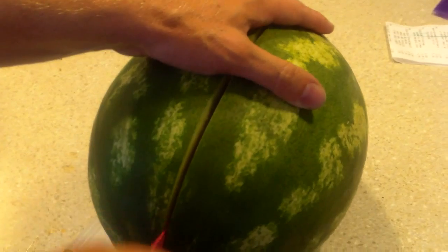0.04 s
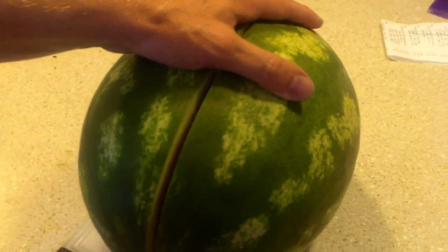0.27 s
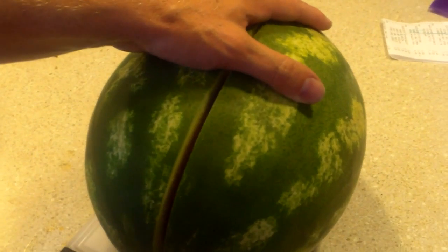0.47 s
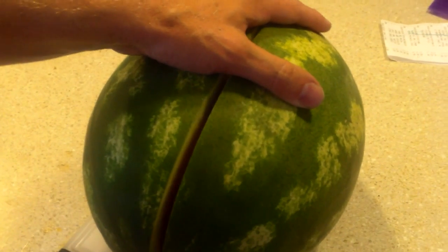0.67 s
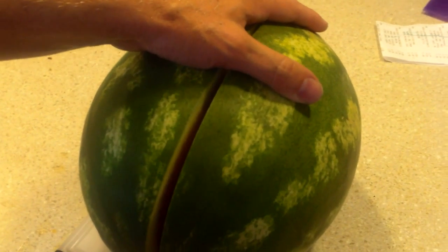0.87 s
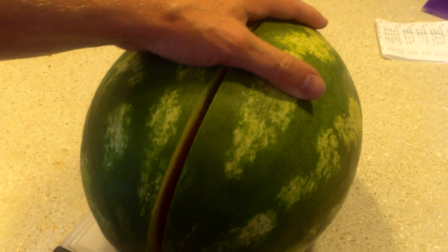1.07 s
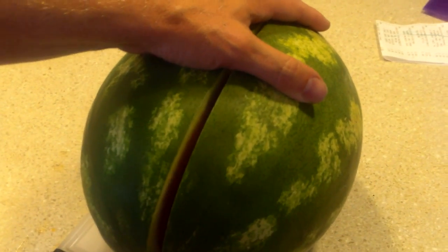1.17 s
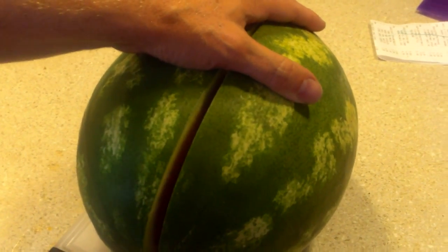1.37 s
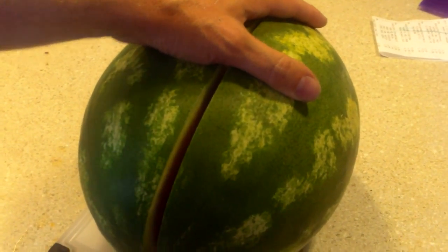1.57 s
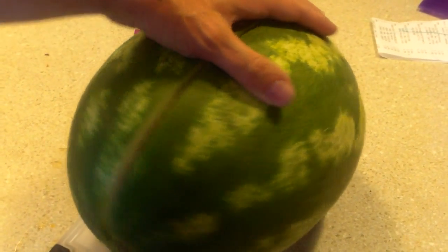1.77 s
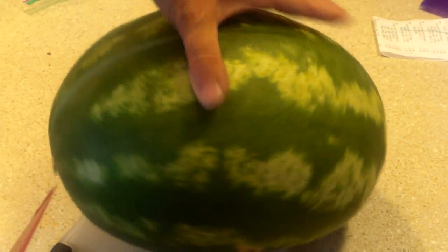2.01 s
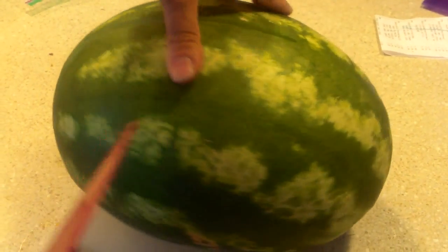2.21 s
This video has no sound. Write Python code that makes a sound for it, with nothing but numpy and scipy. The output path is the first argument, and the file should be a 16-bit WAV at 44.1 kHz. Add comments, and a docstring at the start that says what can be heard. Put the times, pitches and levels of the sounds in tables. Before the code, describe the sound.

Dry cracking and crackling of a watermelon being pressed apart on a kitchen counter.

```python
"""A cut watermelon is pressed open on a kitchen counter, close to a single microphone.
The rind tears in two runs of dry cracks with a fine crackle of fibres between them, then gives a few
last snaps; the heavy fruit thuds dully under them. It is then turned round with a soft rub.
The small hard room answers each crack. Behind it an appliance hums faintly and a low drone swells late."""
import sys
import numpy as np
from scipy import signal
from scipy.fft import rfft, irfft, next_fast_len
from scipy.io import wavfile

SR = 44100
rng = np.random.default_rng(int(sys.argv[2]) if len(sys.argv) > 2 else 0)


def digitize_waveform(pressure):
    """Quantize a signal to 16-bit integers and store it at the path in sys.argv[1].

    Rows of a 2-D input are taken as channels; values are limited to [-1, 1].
    """
    field = np.atleast_2d(pressure).T
    bounded = np.clip(field, -1, 1)
    quanta = np.round(bounded * 32767).astype(np.int16)
    wavfile.write(sys.argv[1], SR, quanta)


N = 99225
T = np.arange(N) / SR

# breaks in the rind, relative to the usual crack: start_s, level_db, low_db, middle_hz, middle_db, top_db
RIND_CRACKS = [(0.1982, -12.5, -4, 4200, -2, -1), (0.2124, 2, -2, 6000, -9, 3),
               (0.2204, 6, -6, 6000, -2.5, 4), (0.2321, 5, -11, 5030, 2.5, 9.5),
               (0.2447, 4, -12, 2000, -11, -7), (0.2509, -0.5, -10, 2000, 2, 8),
               (0.2554, 5.5, 8, 2000, 10, 7), (0.258, 13, -3, 3500, -3, -2),
               (0.2619, 8, -2.5, 2900, -12, -3), (0.3052, -1.5, -2, 2400, -25, 12),
               (0.3166, 0, -8, 6000, -12, 0), (0.3303, 3.5, -2, 4200, -3, 5),
               (0.356, -0.5, -0.5, 3470, 3, 11), (0.365, -9, 10.5, 2940, 18, 11),
               (0.37, -9, -2, 2900, -2, 8), (0.381, 0, 8.5, 3500, 6.5, 10), (0.3899, 5, 9.5, 1980, -3, 6),
               (0.3937, 2.5, 5.5, 2000, -7, 7), (0.4166, 3, 6, 6000, -6, 4),
               (0.516, -0.5, -10, 5900, -15, -3), (0.5278, 5, 8, 6000, -4.5, -2),
               (0.7744, 1.5, 3.5, 6040, 1, -4), (0.7914, 7.5, -8, 2880, -9, -2),
               (0.7948, 10.5, -4, 6000, -7, -12), (0.821, 11, 5, 4970, -5.5, -3),
               (0.841, 10, 0.5, 6000, -5, -7), (0.901, 1, 2, 5030, 12.5, 0), (0.9136, 8, 5, 2380, 11, 1),
               (0.9943, 9.5, -4, 5900, 7.5, 3.5), (1.182, -3.5, -16, 6000, 3, -5),
               (1.2418, 14, -13.5, 6070, -3, -3)]


def rind_cracks(size=2048):
    """The rind breaks, fibres splinter, counter and hand scatter it; returns (close sound, room feed)."""
    # colour of the usual crack: frequency_hz, gain_db
    rind_colour = [(60, -20), (200, -6), (400, -8.5), (700, -10), (1100, -6.5), (1600, -5.5), (2200, -5),
                   (2900, -3.5), (3700, -1.5), (4600, -5.5), (5600, -0.5), (6800, -4.5), (8100, -0.5),
                   (9400, 4), (10700, -2.5), (12500, -12.5), (14500, -18), (16000, -21)]
    low_hz, core_hz, top_hz = 1170, 8670, 13000
    room_share = 0.87   # part of each crack's own colour that reaches the room
    close, room_feed = np.zeros(N), np.zeros(N)
    click = -signal.unit_impulse(size)
    for start_s, level_db, low_db, middle_hz, middle_db, top_db in RIND_CRACKS:
        splinters = burst(size, decay_s=0.00088)
        scatter = from_db(-5) * burst(size, decay_s=0.0038)
        snap = click + splinters + scatter
        gain = from_db(level_db - .5)
        tone = [(low_hz, low_db), (middle_hz, middle_db), (core_hz, 0), (top_hz, top_db)]
        add(close, start_s, gain * colour(snap / np.linalg.norm(snap), tone))
        add(room_feed, start_s, gain * colour(click, [(hz, room_share * db) for hz, db in tone]))
    return colour(close, rind_colour), room_feed


def fibre_crackle():
    """Tiny fibres part at random as the tear runs, a few tick alone; returns (close sound, room feed)."""
    # how hard the flesh is tearing: time_s, level_db
    tearing = [(.15, -40), (.21, -23), (.262, -26), (.295, -31), (.35, -29.5), (.395, -15.5), (.43, -19.5),
               (.47, -43.5), (.535, -19.5), (.6, -53), (.768, -30.5), (.795, -10), (.83, -11.5), (.87, -31),
               (.95, -29), (1.1, -45), (1.21, -34), (1.3, -55)]
    # faint lone ticks of the rind: start_s, level_db
    ticks = [(.058, -26.5), (.465, -21), (.5065, -21), (1.2135, -26), (1.872, -22.5), (2.056, -24)]
    # colour of the crackle at the microphone: frequency_hz, gain_db
    crackle_colour = [(100, -5), (350, 6.5), (700, -1), (1200, 2), (2500, 0), (7000, -0.5), (9600, 3),
                      (12500, -11.5), (16500, -18)]
    fibres_per_s, spread_db = 2500, 2.5
    parting = rng.random(N) < fibres_per_s / SR
    strength = from_db(spread_db * np.minimum(rng.exponential(1, N), 3) - 5.5)
    clicks = parting * strength * rng.choice([-1, 1], N) * level(tearing)
    for start_s, level_db in ticks:
        add(clicks, start_s, from_db(level_db) * burst(512, decay_s=0.00088))
    return clicks_heard(clicks, crackle_colour)


def fruit_body():
    """The whole fruit rings with each crack, and thuds when its halves shift on the counter."""
    # modes of the fruit: pitch_hz, gain_db, t60_s
    modes = [(119, -51, 0.16), (158.8, -41, 0.23), (240, -47.5, 0.2), (333.4, -35, 0.07), (438, -42, 0.084)]
    # thuds of the halves: start_s, pitch_hz, level_db
    shifts = [(.256, 329, -26.5), (.334, 154, -31.5), (.388, 107, -31.5), (0.424, 237, -31.5),
              (0.532, 220, -33.5), (.776, 136, -30), (.778, 225, -33), (0.791, 273, -28.5),
              (.823, 148, -26), (.918, 146, -32.5), (.995, 132, -42.5), (1.714, 253, -43.5)]
    pushes, thuds = np.zeros(N), np.zeros(N)
    for start_s, level_db, low_db, *_ in RIND_CRACKS:
        add(pushes, start_s, from_db([level_db + low_db - 11.5]))
    rise_s, t60_s = 0.0042, 0.098
    envelope = (1 - np.exp(-T / rise_s)) * from_db(-60 * T / t60_s)
    for start_s, pitch_hz, level_db in shifts:
        add(thuds, start_s, from_db(level_db) * envelope * np.sin(2 * np.pi * pitch_hz * T))
    return thuds + sum(from_db(db) * ring(pushes, hz, t60) for hz, db, t60 in modes)


def skin_rub():
    """Smooth skin slides on the counter with a soft hiss and now and then catches in a thin squeak."""
    # rubbing as the fruit moves: time_s, level_db
    sliding = [(0, -69), (.18, -53), (.65, -66), (1.1, -52), (1.44, -56), (1.53, -48), (1.62, -48),
               (1.71, -43.5), (1.8, -49.5), (1.9, -50.5), (1.98, -55.5), (2.06, -52.5), (2.25, -60.5)]
    # colour of the hiss: frequency_hz, gain_db
    rub_colour = [(100, -18), (200, -5.5), (270, -1.5), (400, -7.5), (700, -9.5), (1300, -9), (2200, -9.5),
                  (3300, -9.5), (4900, -12), (5800, -8), (6700, -16.5), (8300, -13.5), (10000, -7),
                  (12500, -22.5), (17000, -23.5)]
    # catches of the skin: start_s, length_s, pitch_hz, level_db
    squeaks = [(0.122, 0.044, 650, -42), (.121, 0.014, 516, -40.5), (1.719, 0.035, 2960, -43),
               (1.72, 0.033, 4150, -43), (1.939, 0.057, 1693, -51.5)]
    waver_depth, waver_hz, rise_s = .025, 150, .003
    smoothing = signal.butter(2, waver_hz, fs=SR, output="sos")
    rub = level(sliding) * noise(rub_colour)
    for start_s, length_s, pitch_hz, level_db in squeaks:
        waver = rms_one(signal.sosfilt(smoothing, rng.standard_normal(N)))
        tone = np.sin(2 * np.pi * np.cumsum(pitch_hz * (1 + waver_depth * waver)) / SR)
        envelope = np.interp(T, [0, rise_s, length_s], [0, 1, 0])
        add(rub, start_s, from_db(level_db) * tone * envelope)
    return rub


def kitchen_reverb(x):
    """Hard walls return a diffuse tail that dies at its own rate in each band."""
    # the room's answer: frequency_hz, gain_db, t60_s
    room = [(100, -29.5, .4), (348, -13, 0.23), (620, -17.5, 0.39), (1090, -12, 0.47), (1800, -17, 0.6),
            (2600, -12.5, 0.61), (4000, -11.5, 0.53), (5740, -12, 0.8), (7400, -19.5, 0.58),
            (9530, -8, 0.46), (10900, -15.5, 0.48), (12800, -27, 0.3), (16000, -35, 0.22)]
    hz, db, t60 = np.transpose(room)
    edges_hz, build_s = np.geomspace(60, 18000, 15), .002
    t, tail = T[:SR], 0
    for band in zip(edges_hz, edges_hz[1:]):
        band_t60 = np.interp(np.mean(np.log(band)), np.log(hz), t60)
        fade = from_db(-60 * t / band_t60) * (1 - np.exp(-t / build_s))
        bandpass = signal.butter(2, band, "band", fs=SR, output="sos")
        hiss = signal.sosfilt(bandpass, rng.standard_normal(len(t)))
        tail = tail + hiss * fade / np.linalg.norm(fade)
    return signal.fftconvolve(x, colour(tail, list(zip(hz, db))))[:N]


def room_tone():
    """An appliance hums steadily in the kitchen's air, and a low drone swells near the end."""
    # tones of the appliance: pitch_hz, level_db
    appliance = [(247.6, -65.5), (285.3, -64), (393, -61.5)]
    # colour of the room air: frequency_hz, gain_db
    air_colour = [(15, -23), (25, 1.5), (199, -5.5), (404, -7), (451, -16.5), (517, -7.5), (626, -11.5),
                  (1270, -15), (1720, -21), (2020, -14), (2200, -21), (9850, -28), (17000, -27)]
    drone_hz, drone_gain = 76.2, level([(0, -67), (1.74, -67), (1.83, -57.5), (2.25, -60.5)])
    tones = [(hz, from_db(db)) for hz, db in appliance] + [(drone_hz, drone_gain)]
    hum = sum(gain * np.sqrt(2) * np.sin(2 * np.pi * (hz * T + rng.random())) for hz, gain in tones)
    return hum + from_db(-53.5) * noise(air_colour)


def from_db(db):
    """Decibels to gain."""
    return 10 ** (np.asarray(db) / 20)


def rms_one(x):
    """Scale to rms 1."""
    return x / np.sqrt(np.mean(x ** 2) + 1e-20)


def level(points):
    """Gain over time from (time_s, level_db) points."""
    return from_db(np.interp(T, *np.transpose(points)))


def add(out, start_s, x):
    """Mix x into out from start_s on."""
    i = int(np.clip(start_s * SR, 0, N - 1))
    out[i:i + len(x)] += x[:N - i]


def colour(x, points):
    """Causal (minimum-phase) filter through (frequency_hz, gain_db) points."""
    size = 2 * next_fast_len(len(x))
    hz, db = np.transpose(points)
    gain = from_db(np.interp(np.log(np.fft.rfftfreq(size, 1 / SR) + 1), np.log(hz), db))
    cepstrum = irfft(np.log(gain))
    cepstrum[1:size // 2] *= 2
    cepstrum[size // 2 + 1:] = 0
    return irfft(rfft(x, size) * np.exp(rfft(cepstrum)))[:len(x)]


def noise(points):
    """Steady noise of a given colour, rms 1."""
    return rms_one(colour(rng.standard_normal(N), points))


def ring(x, hz, t60_s):
    """A resonance: a unit click starts a dying sine of height 1."""
    decay, step = from_db(-60 / (t60_s * SR)), 2 * np.pi * hz / SR
    return signal.lfilter([0, np.sin(step)], [1, -2 * decay * np.cos(step), decay * decay], x + 1e-18)


def burst(size, decay_s):
    """Dying noise of unit energy."""
    x = rng.standard_normal(size) * np.exp(-T[:size] / decay_s)
    x[:2] = 0
    return x / np.linalg.norm(x)


def clicks_heard(clicks, points):
    """Clicks coloured for the close microphone, and bare for the room."""
    return colour(clicks, points), clicks


def scene():
    """The splitting fruit close up with the kitchen behind it, in mono."""
    cracks, cracks_to_room = rind_cracks()
    crackle, crackle_to_room = fibre_crackle()
    body = fruit_body()
    reverb = kitchen_reverb(cracks_to_room + crackle_to_room + body)
    return (cracks + crackle + body + reverb + skin_rub() + room_tone())[None]


def record(dry):
    """Peaks above full scale clip, then a steep low-pass cuts the very top."""
    cutoff_hz = 17300
    lowpass = signal.ellip(10, .2, 80, cutoff_hz, fs=SR, output="sos")
    return signal.sosfilt(lowpass, np.clip(dry, -1, 1))


dry = scene()
out = record(dry)
digitize_waveform(out)
```